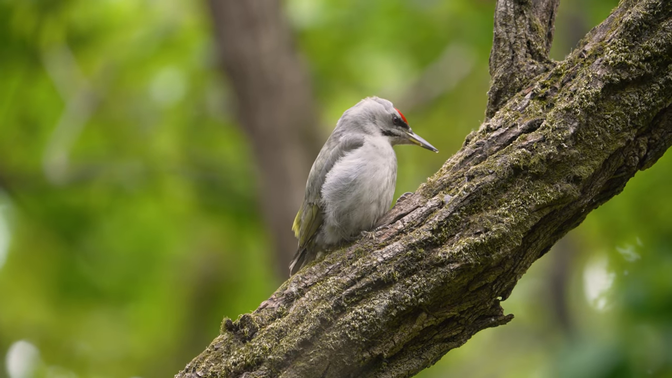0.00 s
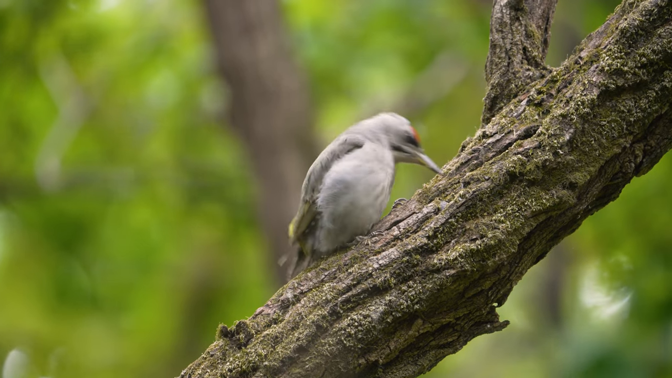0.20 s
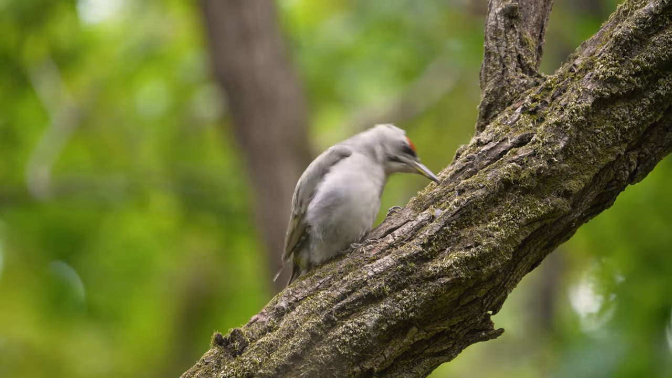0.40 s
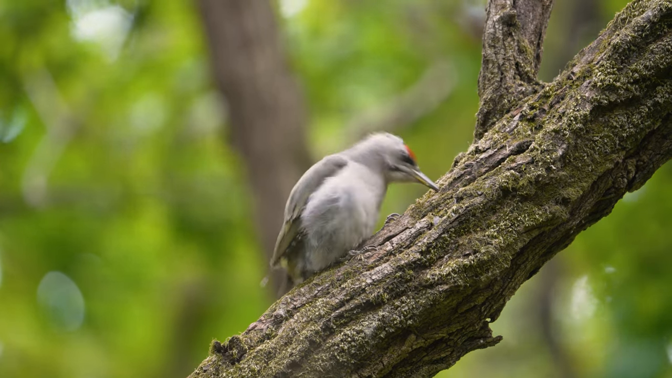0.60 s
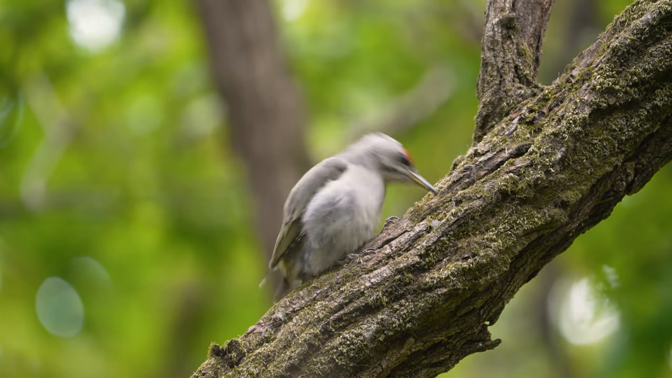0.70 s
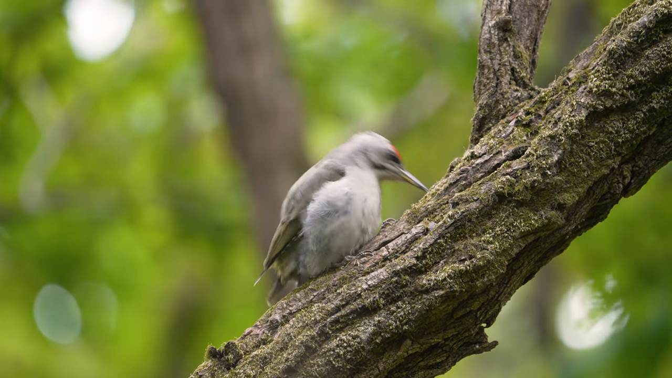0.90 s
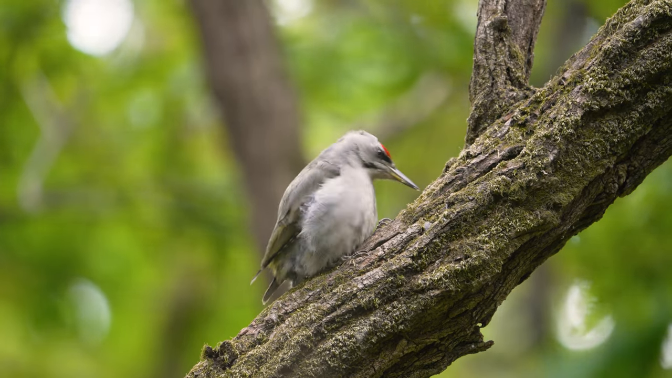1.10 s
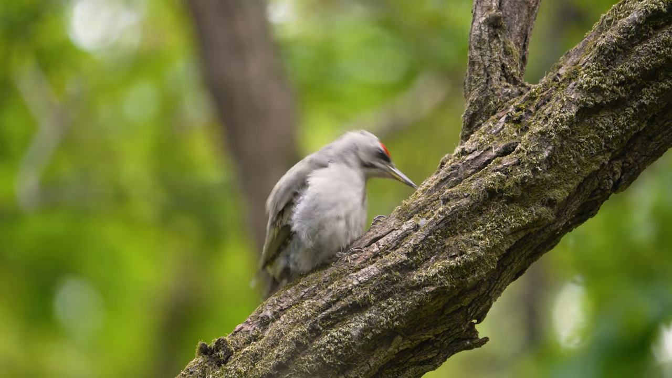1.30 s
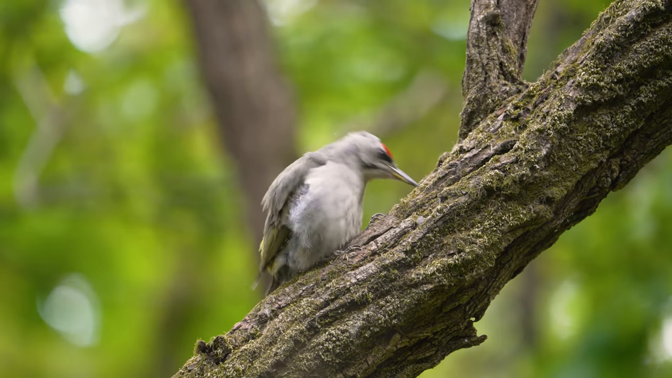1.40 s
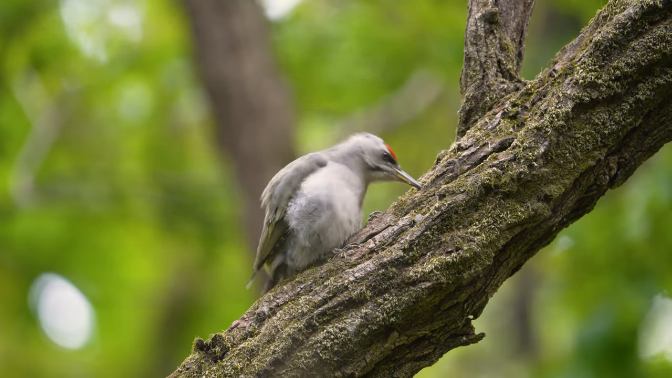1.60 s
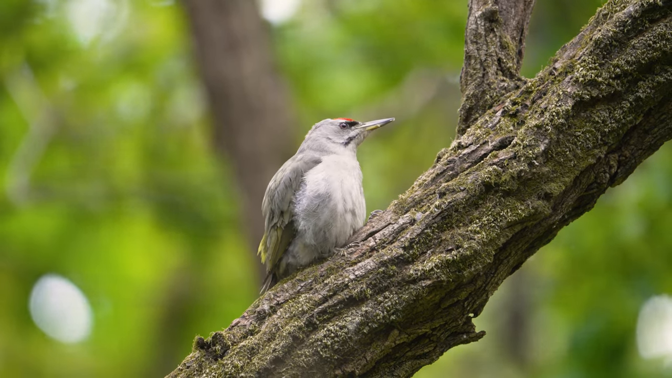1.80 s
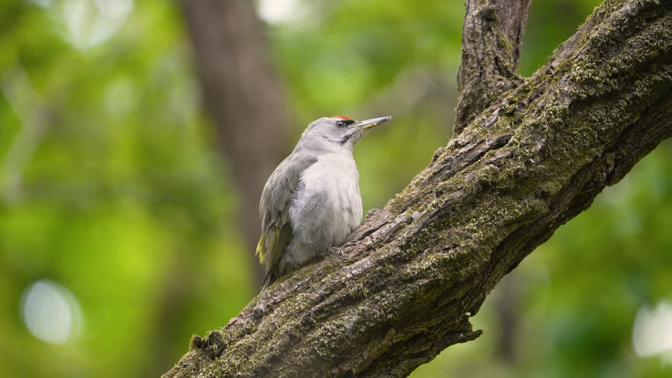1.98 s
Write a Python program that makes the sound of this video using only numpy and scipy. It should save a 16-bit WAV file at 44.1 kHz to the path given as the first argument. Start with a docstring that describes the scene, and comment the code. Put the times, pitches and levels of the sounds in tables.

```python
"""A woodpecker drums one roll on a hollow branch: 29 blows, about 19 a second, slowing slightly, the last one soft.
Each blow sets decaying tones ringing, strongest near 850 Hz, and adds a short crack of filtered noise.
Delayed copies are the echoes from nearby trunks; two fading noise tails let the forest linger.
Small birds, made of gliding sine tones, chirp far off.
Filtered noise makes a faint hush of leaves, a fading rustle and a low rumble of air."""
import sys
import numpy as np
from scipy import signal
from scipy.fft import rfft, irfft
from scipy.io import wavfile
from scipy.ndimage import uniform_filter1d

SR = 44100
rng = np.random.default_rng(int(sys.argv[2]) if len(sys.argv) > 2 else 0)


def unload_audio(sound):
    """Save the sound as a 16-bit wav file, at the path given as the first command line argument."""
    columns = np.transpose(np.atleast_2d(sound))
    # keep every value between -1 and 1, then stretch to whole-number steps
    steps = np.round(np.clip(columns, -1, 1) * 32767)
    wavfile.write(sys.argv[1], SR, steps.astype(np.int16))


N = 88200
T = np.arange(N) / SR   # time in seconds

# How the near trees colour the sound they scatter. Each row: frequency in Hz, level in dB.
NEAR_FOREST_COLOUR = [(500, -2), (850, -7.5), (1250, 9), (1750, 3.5), (2600, 1), (4000, 3), (8000, -10),
                      (16000, -16)]
NEAR_T60_S, NEAR_BUILD_S = 0.37, 0.0055   # seconds to fall 60 dB, and time constant of the build-up


def from_db(db):
    """Turn decibels into a gain, where 20 dB is a factor of ten."""
    return 10 ** (np.asarray(db) / 20)


def colour(x, spectrum):
    """Filter by a curve of (Hz, dB) points joined by straight lines on a log-frequency axis."""
    hz, db = np.transpose(spectrum)
    bins_hz = np.maximum(np.fft.rfftfreq(N, 1 / SR), 1)
    gain = from_db(np.interp(np.log(bins_hz), np.log(hz), db))
    return irfft(rfft(x) * gain, N)


def noise(spectrum):
    """Random hiss shaped by a curve, then scaled to an rms level of 1."""
    hiss = colour(rng.standard_normal(N), spectrum)
    return hiss / hiss.std()


def clicks(times, db):
    """Silence with a one-sample click of the given height at each time."""
    out = np.zeros(N)
    positions = np.clip(np.round(times * SR).astype(int), 0, N - 1)
    out[positions] = from_db(db)
    return out


def ring(x, hz, t60):
    """A resonator: a click of height 1 starts a sine of height 1 that falls 60 dB in t60 seconds."""
    decay = from_db(-60 / (t60 * SR))   # per sample
    step = 2 * np.pi * hz / SR   # phase advance per sample
    feedback = [1, -2 * decay * np.cos(step), decay * decay]
    return signal.lfilter([0, np.sin(step)], feedback, x + 1e-18)   # tiny offset avoids slow, near-zero numbers


def dying(t60):
    """Fading level, as energy drains away: 60 dB down after t60 seconds."""
    return from_db(-60 * T / t60)


def reverberate(x, t60, build_s, spectrum):
    """Many overlapping reflections, heard as a noise tail that builds up and dies away."""
    build_up = 1 - np.exp(-T / build_s)
    tail = rng.standard_normal(N) * dying(t60) * build_up
    tail = colour(tail / np.linalg.norm(tail), spectrum)
    tail = tail[:N - SR // 2]   # leave off the end, where the filter wraps round
    return signal.fftconvolve(x, tail)[:N]


def air():
    """Noise in three layers: a steady hush of air and leaves, low thuds of air, a rustle that settles."""
    # Soft low thuds of air. Each row: centre in seconds, width (standard deviation) in seconds, level in dB.
    thuds = [(.31, 0.049, -41.5), (1.17, 0.011, -32), (1.401, 0.054, -43.5), (1.52, 0.044, -45.5)]
    # Tone of the thuds. Each row: frequency in Hz, relative level in dB per Hz.
    thud_colour = [(20, -29), (45, -1.5), (68, -9), (100, -10.5), (140, -13.5), (220, -17.5), (600, -65)]
    # Tone of the air and leaves. Each row: frequency in Hz, relative level in dB per Hz.
    air_colour = [(20, -9), (40, -4.5), (60, 0.5), (95, -12), (200, -12), (400, -13.5), (1000, -18.5),
                  (2000, -19), (3000, -22.5), (3900, -20), (5000, -28.5), (6200, -33.5), (7800, -35),
                  (10000, -43), (12500, -51), (16000, -47)]
    # Tone of the light rustle. Each row: frequency in Hz, relative level in dB per Hz.
    rustle_colour = [(500, -14.5), (2800, 0), (6000, -10), (11000, -21.5), (16000, -27)]
    air_db = -42.5
    rustle_db, rustle_t60_s = -51, 4.7

    swells = 0
    for centre, width, db in thuds:
        swells = swells + from_db(db) * np.exp(-.5 * ((T - centre) / width) ** 2)
    hush = from_db(air_db) * noise(air_colour)
    rustle = from_db(rustle_db) * dying(rustle_t60_s) * noise(rustle_colour)
    return hush + swells * noise(thud_colour) + rustle


def small_birds():
    """Thin whistles: sine tones that glide between three pitches and waver, blurred by the trees."""
    # Chirps of small birds. Each row: start in seconds, length in seconds, start, top (halfway) and
    # end pitch in Hz, typical wobble as a share of pitch, direct level in dB, level sent to the reverberation in dB.
    chirps = [(0.032, 0.022, 3600, 3880, 3720, 0.053, -43, -43.5),
              (0.118, 0.019, 3950, 4190, 3800, 0.042, -41.5, -45),
              (0.174, .05, 3700, 4155, 3870, 0.048, -54, -49),
              (1.043, .078, 3540, 4090, 3540, 0.0081, -40.5, -45),
              (1.66, 0.063, 4500, 4860, 4940, 0.012, -54.5, -63),
              (1.766, 0.052, 4050, 4010, 4000, 0.013, -68, -57),
              (1.882, 0.052, 3800, 4080, 3700, 0.0086, -53, -67),
              (1.885, .075, 4450, 4900, 4750, 0.029, -55.5, -65),
              (1.985, 0.033, 3550, 3780, 3800, 0.0077, -57, -57)]
    fade_s = 0.0055   # in and out

    direct, far = 0, 0
    waver = uniform_filter1d(rng.standard_normal(N), size=100)
    waver = waver / waver.std()
    for start, length, start_hz, top_hz, end_hz, wobble, direct_db, far_db in chirps:
        corners = [start, start + length / 2, start + length]
        hz = np.interp(T, corners, [start_hz, top_hz, end_hz])
        hz = hz * (1 + wobble * waver)
        nearest_end = np.minimum(T - start, start + length - T)
        envelope = np.clip(nearest_end / fade_s, 0, 1)
        whistle = envelope * np.sin(2 * np.pi * np.cumsum(hz) / SR)
        direct = direct + from_db(direct_db) * whistle
        far = far + from_db(far_db) * whistle
    return direct + reverberate(far, NEAR_T60_S, NEAR_BUILD_S, NEAR_FOREST_COLOUR)


def drumming():
    """Each blow rings the branch's own tones (modes) and adds a crack of bark, with its own brightness."""
    # Blows of the bill. Each row: time in seconds, strength in dB, extra brightness in dB.
    blows = [(0.241, 1.1, 0.8), (0.2901, -0.6, 0.7), (0.3423, -0.3, -0.5), (0.3935, 0.8, 0.5),
             (0.4442, 0.5, 0.7), (0.4971, -0.4, 0.6), (0.549, -0.2, -0.5), (0.6006, -0.2, 0.8),
             (0.6524, -0.0, 0.7), (0.7041, -1.0, 0.2), (0.7558, -0.0, 0.7), (0.807, 0.7, 0.0),
             (0.858, 0.1, -0.3), (0.91, -0.0, -1.3), (0.9613, 0.7, -0.5), (1.0134, 0.1, -0.6),
             (1.0658, 0.9, 0.2), (1.1184, 0.4, -0.0), (1.1703, 0.5, 0.4), (1.2217, 0.1, 0.4),
             (1.276, -0.0, -0.6), (1.3284, 0.4, -0.9), (1.382, -0.4, -0.1), (1.4337, 0.3, 0.0),
             (1.4876, -0.2, 0.4), (1.5416, 0.3, 0.3), (1.5951, 0.3, 0.2), (1.65, -1.1, 0.3),
             (1.7055, -4.1, -1.5)]
    # Modes of the branch. Each row: frequency in Hz, level in dB, time to fall 60 dB in seconds.
    branch = [(677, -28, .05), (726, -23.5, 0.036), (835.4, -7.5, 0.048), (1286, -24.5, 0.024),
              (1520, -52, 0.005), (1751, -13, 0.018), (2583, -22, 0.016), (3150, -29.5, 0.008),
              (3854, -39.5, 0.025), (4520, -42, 0.017), (5180, -41, .017), (6880, -52, 0.02)]
    # Tone of the bill on bark. Each row: frequency in Hz, level in dB per Hz.
    crack_colour = [(500, -1.5), (1200, -6.5), (3500, 7), (5000, -8), (8000, -16), (16000, -35.5)]
    bright_from_hz, bright_full_hz = 1100, 1700   # the extra brightness comes in gradually between these
    mode_scatter_db = 0.14   # the upper modes answer each blow a little differently
    after_ring_hz, after_ring_db, after_ring_t60_s = 852.1, -17, 0.12
    crack_db, crack_t60_s = -36.5, .04
    low_cut_hz, low_cut_depth_db = 525, 20.5   # the branch radiates little below this

    times, db, bright_db = np.transpose(blows)
    scatter = rng.standard_normal((len(times), len(branch)))
    wood = 0
    for k, (hz, mode_db, t60) in enumerate(branch):
        upper = np.interp(hz, [bright_from_hz, bright_full_hz], [0, 1])
        extra_db = upper * (bright_db + mode_scatter_db * scatter[:, k])
        tone = ring(clicks(times, db + mode_db + extra_db), hz, t60)
        wood = wood - (-1) ** k * tone   # neighbouring modes swing in opposite directions

    # the main note rings on quietly beside the louder, faster mode
    wood = wood - ring(clicks(times, db + after_ring_db), after_ring_hz, after_ring_t60_s)

    contact = signal.fftconvolve(clicks(times, db + bright_db + crack_db), dying(crack_t60_s))[:N]
    crack = colour(contact * rng.standard_normal(N), crack_colour)
    low_cut = signal.cheby2(4, low_cut_depth_db, low_cut_hz, "high", fs=SR, output="sos")
    return signal.sosfilt(low_cut, wood + crack)


def echoes(x):
    """Distinct reflections: later, weaker copies from the surrounding wood."""
    # Echoes from near limbs and farther trunks. Each row: delay in seconds, level in dB.
    reflections = [(.00485, -18), (.01036, -23.5), (.021, -26.5), (.0287, -29.5), (.0345, -28), (.114, -34),
                   (.171, -28)]
    total = 0
    for delay, db in reflections:
        total = total + from_db(db) * np.interp(T - delay, T, x, left=0)
    return total


def forest(x):
    """Near trees scatter the sound almost at once; distant ones answer later and linger."""
    # How the distant trees colour the sound. Each row: frequency in Hz, level in dB.
    far_colour = [(500, -3.5), (850, 5.5), (1250, 3), (1750, -1), (3000, -7.5), (16000, -17)]
    near_db = -17
    far_db, far_t60_s, far_build_s = -24.5, 0.63, 0.041
    near = from_db(near_db) * reverberate(x, NEAR_T60_S, NEAR_BUILD_S, NEAR_FOREST_COLOUR)
    far = from_db(far_db) * reverberate(x, far_t60_s, far_build_s, far_colour)
    return near + far


def scene():
    """Add up the roll, its echoes and tails, the far birds and the air, as one channel."""
    roll = drumming()
    mix = roll + echoes(roll) + forest(roll) + small_birds() + air()
    return mix[None]


def record(dry):
    """A steep low-pass filter takes away the very highest sound."""
    cutoff_hz = 15900
    low_pass = signal.ellip(10, .1, 90, cutoff_hz, fs=SR, output="sos")   # 0.1 dB ripple, 90 dB cut
    return signal.sosfilt(low_pass, dry)


dry = scene()
out = record(dry)
unload_audio(out)
```